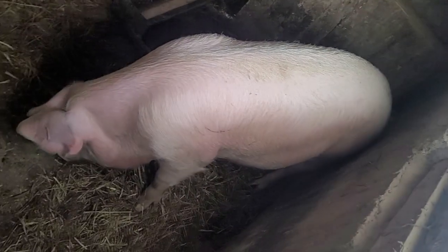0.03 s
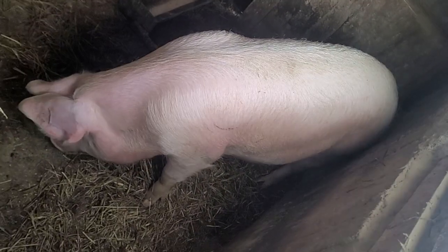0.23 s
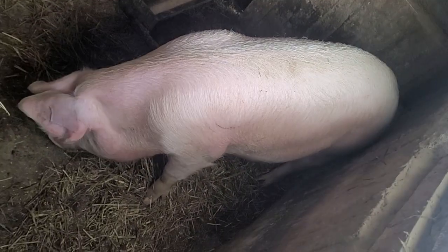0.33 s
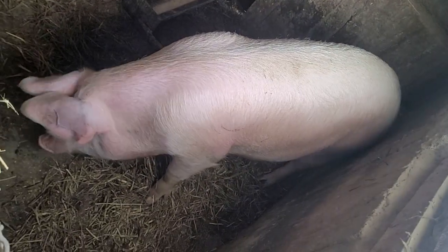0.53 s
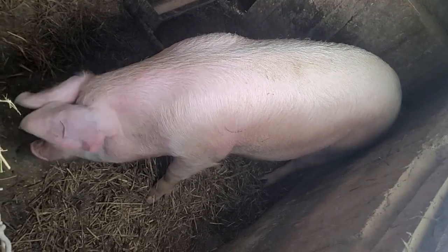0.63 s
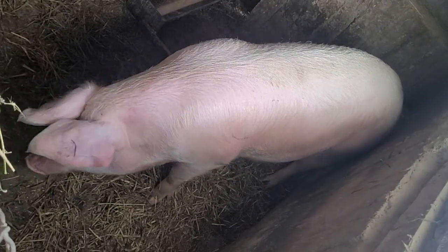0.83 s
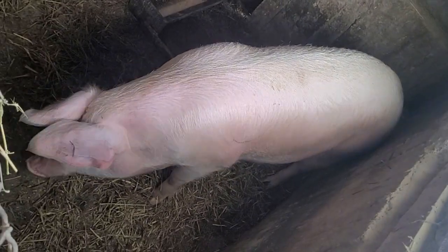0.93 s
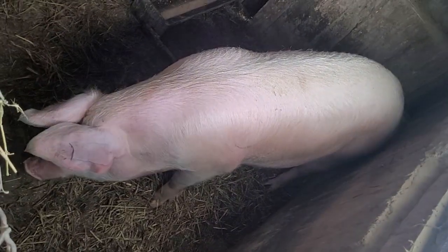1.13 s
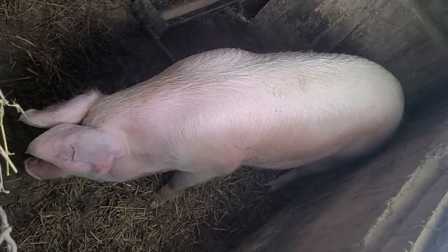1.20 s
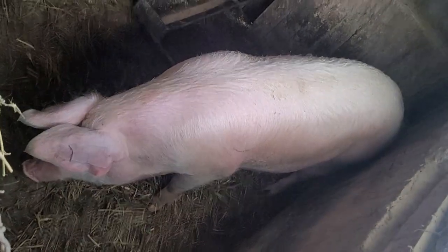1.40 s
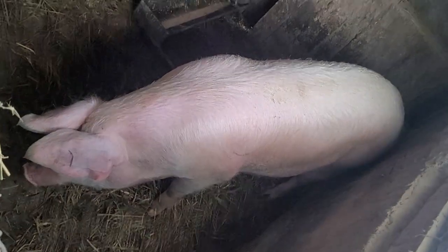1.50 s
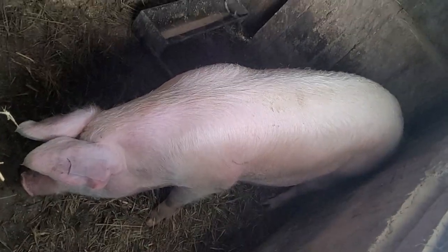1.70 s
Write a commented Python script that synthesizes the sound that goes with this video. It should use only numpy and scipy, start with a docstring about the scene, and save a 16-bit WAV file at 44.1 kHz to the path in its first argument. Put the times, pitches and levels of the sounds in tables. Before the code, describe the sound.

One dull thump in a pig pen, with soft bumps and faint straw rustling.

```python
"""Pig shifting in a concrete pen

One dull thump booms between the walls and leaves a thin low ring, perhaps a rail. Around it the
pig's body bumps softly and straw rustles; a small hollow tap and a close crunch follow. The microphone,
muffled on its right side, rumbles with handling at the start and takes a dull nudge at the end."""
import sys
import numpy as np
from scipy import signal
from scipy.fft import rfft, irfft, next_fast_len
from scipy.io import wavfile
from scipy.ndimage import map_coordinates

SR = 44100
rng = np.random.default_rng(int(sys.argv[2]) if len(sys.argv) > 2 else 0)


def inscribe(sig):
    """Save sig as 16-bit PCM at rate SR to the path in sys.argv[1].

    A 1-D sig is mono; a 2-D sig holds one channel per row.
    Samples are clipped to [-1, 1] before scaling.
    """
    pcm = np.round(np.clip(np.atleast_2d(sig).T, -1, 1) * 32767)
    wavfile.write(sys.argv[1], SR, pcm.astype(np.int16))


N = 77175


def amp(db):
    """Decibels to gain."""
    return 10 ** (np.asarray(db) / 20)


def unit(x):
    """Scale to rms 1."""
    return x / np.sqrt(np.mean(x ** 2) + 1e-20)


def along(points, hz):
    """Read a curve of (Hz, value) points on a log frequency axis."""
    freqs, values = np.transpose(points)
    return np.interp(np.log(hz + 1), np.log(freqs + 1), values)


def since(start):
    """Seconds since start, zero before."""
    return np.maximum(np.arange(N) / SR - start, 0)


def envelope(start, rise, t60, hold=0):
    """Linear rise, hold, then a fall of 60 dB per t60; all times in seconds."""
    t = since(start)
    attack = np.minimum(t / max(rise, 1e-4), 1)
    return attack * amp(-60 * np.maximum(t - rise - hold, 0) / t60)


def filtered(x, response):
    """Filter x by a complex gain given as a function of Hz."""
    size = next_fast_len(N + SR // 2)
    return irfft(rfft(x, size) * response(np.fft.rfftfreq(size, 1 / SR)), size)[..., :N]


# How alike the pen sounds at the microphone's two sides. Each row: frequency in Hz, correlation.
STEREO_LIKENESS = [(60, 1), (250, 0.49), (500, 0.38), (1000, 0.9), (3000, .1)]

def noise(colour_db):
    """Stereo noise of rms 1, alike in the deep bass and diffuse in the treble."""
    def mid_side_gains(hz):
        angle = np.arccos(np.clip(along(STEREO_LIKENESS, hz), -1, 1)) / 2
        return amp(colour_db(hz)) * [np.cos(angle), np.sin(angle)]
    mid, side = filtered(rng.standard_normal((2, N)), mid_side_gains)
    return unit(np.array([mid + side, mid - side]))


def wash(spectrum):
    """Stereo noise shaped by (Hz, relative dB) points."""
    return noise(lambda hz: along(spectrum, hz))


# The quiet of the pen, all around the microphone. Each row: frequency in Hz, relative level in dB.
AIR_SPECTRUM = [(20, -20.5), (50, -10), (130, -5), (280, 3.5), (500, -3.5), (800, -12), (1400, -6),
                (1800, -14.5), (3200, -14), (3900, -7), (5000, -15), (7300, -15), (8600, -23), (12000, -21),
                (15500, -25.5)]

def still_air():
    """A faint, steady wash under everything."""
    return amp(-60.5) * wash(AIR_SPECTRUM)


# Handling noise, right on the microphone. Each row: frequency in Hz, relative level in dB.
RUMBLE_SPECTRUM = [(18, -22), (32, -1), (55, -4), (100, -5.5), (250, -42.5)]

def handling_rumble():
    """Handling the microphone makes a brief, deep rumble at the start."""
    return amp(-45.5) * envelope(0, rise=0.036, t60=0.55, hold=0.05) * wash(RUMBLE_SPECTRUM)


# The colour of a soft bump. Each row: frequency in Hz, relative level in dB.
BUMP_SPECTRUM = [(20, -39), (35, -20.5), (60, -13.5), (100, -20.5), (140, -10.5), (250, -1), (420, -8.5),
                 (550, -13.5), (750, -20), (1100, -12.5), (3000, -37)]
# Soft bumps of the pig's body in the pen. Each row: start in seconds, level in dB, rise and t60 in
# seconds, upper edge in Hz.
BODY_BUMPS = [(0, -41, 0.0013, 1, 410), (0.074, -40, 0.013, 0.84, 605), (0.135, -39.5, 0.0035, 0.32, 290),
              (0.186, -44, 0.015, .5, 1210), (0.338, -23, 0.0029, 0.22, 507), (0.484, -45, .01, 0.1, 1820),
              (.545, -42.5, 0.011, 0.073, 676), (.645, -51.5, 0.052, 1, 258), (.97, -50.5, 0.021, 0.6, 915),
              (1.029, -46.5, 0.017, 0.052, 430), (1.389, -48, 0.0033, 0.055, 146),
              (1.436, -49, 0.0096, .4, 700), (1.467, -48, 0.0017, .2, 606), (1.505, -45.5, 0.0024, .4, 430),
              (1.551, -49.5, 0.0071, 0.29, 900), (1.593, -43.5, 0.0031, .1, 348),
              (1.645, -50.5, 0.0035, .3, 1210)]

def body_bumps():
    """Low puffs, each with its own level and dullness."""
    out = np.zeros((2, N))
    for start, db, rise, t60, edge_hz in BODY_BUMPS:
        colour = lambda hz: along(BUMP_SPECTRUM, hz) - 10 * np.log10(1 + (hz / edge_hz) ** 4)
        out += amp(db) * envelope(start, rise, t60) * noise(colour)
    return out


def stalk_grain(rate_hz):
    """The slight, fast random flutter in level of many stalks slipping."""
    knots = rng.standard_normal(N // 8)
    flutter_db = -0.5 * map_coordinates(knots, [np.arange(N) * rate_hz / SR], mode="wrap")
    return unit(amp(flutter_db))


# The colour of the straw in the pen. Each row: frequency in Hz, relative level in dB.
STRAW_SPECTRUM = [(200, 10), (600, 4.5), (1400, 0.5), (1800, -0.5), (4000, -9), (7400, -5), (8600, -18),
                  (12000, -9.5), (15500, -23)]
# Straw stirring around the pig. Each row: start in seconds, level in dB, rise and t60 in seconds,
# centre in Hz, width in octaves.
STRAW_RUSTLES = [(0, -50, 0.0011, 1, 2080, 2.5), (.048, -50, .006, 0.87, 2470, 1.7),
                 (.091, -49, 0.0032, .15, 11000, 3), (0.129, -53, .01, 0.51, 6000, 2),
                 (0.229, -51.5, 0.007, 0.6, 9030, 4.7), (0.339, -59, .02, 0.99, 4500, 1.8),
                 (.431, -62, .002, 0.048, 14000, .4), (.46, -57.5, .02, 0.42, 6350, 1.7),
                 (.49, -59, 0.032, 0.63, 2370, 1.2), (0.677, -56, .012, 0.34, 743, 0.23),
                 (.68, -58, 0.017, 0.49, 4230, 0.35), (.721, -57.5, 0.0053, 0.21, 6000, 1.2),
                 (0.886, -55, .001, 0.42, 7300, 4), (0.918, -53.5, 0.022, 1, 1200, 2.5),
                 (0.991, -59, .005, 0.47, 6000, 1.3), (1.085, -62.5, 0.0027, 0.056, 13000, 0.32),
                 (1.15, -66, 0.01, 1, 11400, 0.9), (1.23, -62, 0.041, 0.45, 11900, 2.3),
                 (1.274, -57.5, .006, 0.14, 5040, 0.086), (1.291, -55.5, 0.0054, 0.31, 6500, 1.85),
                 (1.414, -57.5, 0.014, 0.85, 6000, 5.6), (1.508, -52, .04, 0.38, 4840, 7.5)]

def straw_rustles():
    """Stalks slip in short grainy bursts, each in its own register."""
    out = np.zeros((2, N))
    for start, db, rise, t60, centre_hz, octaves in STRAW_RUSTLES:
        off_centre = lambda hz: np.log2((hz + 1) / centre_hz) / octaves
        colour = lambda hz: along(STRAW_SPECTRUM, hz) - 20 * np.log10(1 + off_centre(hz) ** 2)
        out += amp(db) * envelope(start, rise, t60) * noise(colour) * stalk_grain(rate_hz=750)
    return out


# The blow where it lands, then its boom between the concrete walls.
# Each row: frequency in Hz, relative level in dB.
CONTACT_SPECTRUM = [(25, -51.5), (45, -45), (80, -9.5), (160, -28.5), (250, 4), (380, -13.5), (500, -6),
                    (720, -18), (950, -34.5), (1150, -44.5), (1520, -28.5), (1700, -45.5), (2150, -44.5),
                    (2750, -32), (3100, -51), (7000, -62), (15000, -71)]
BOOM_SPECTRUM = [(25, -52.5), (42, -33), (60, -23), (110, -8.5), (185, -6.5), (250, -6), (370, -0.5),
                 (520, -11.5), (760, -14), (1000, -35), (1480, -27.5), (1750, -44.5), (2300, -38.5),
                 (2750, -40.5), (3100, -69), (15000, -76.5)]

def thump(start):
    """A soft, heavy blow: a brief contact and its dense echoes."""
    contact = amp(-12) * envelope(start, rise=0.0053, t60=0.12) * wash(CONTACT_SPECTRUM)
    boom = amp(-25) * envelope(start, rise=0.02, t60=0.59, hold=0.074) * wash(BOOM_SPECTRUM)
    return contact + boom


# The struck pen's modes, heard from the microphone. Each row: frequency in Hz, left level in dB,
# build-up, hold and t60 in seconds, left over right in dB.
PEN_MODES = [(152.5, -28, .05, .055, .42, 1.5), (266, -14, .005, .03, .42, 3.5),
             (361.5, -11.5, .028, .038, .25, 6), (720, -36, .015, .12, .58, 0), (55, -37, .005, .08, .7, 1),
             (77, -35, .005, .09, .65, 1), (226, -24, .005, .08, .55, 2), (247, -29, .01, .14, .3, 2),
             (322, -26, .008, .1, .3, 3), (416, -35, .02, .1, .45, 3), (474, -26, .003, .02, .28, 4),
             (603, -47, .005, .02, 1.1, 3), (909, -54, .005, .03, .45, 5), (2645, -51, .003, .01, .25, 12),
             (2795, -50, .003, .01, .3, 12)]

def pen_ring(start):
    """The modes of the pen build up and die away after a blow."""
    out = np.zeros((2, N))
    for hz, left_db, build, hold, t60, balance_db in PEN_MODES:
        ring = np.sin(2 * np.pi * hz * since(start)) * envelope(start, build, t60, hold)
        right_db = left_db - balance_db - along(RIGHT_SIDE_GAIN, hz)  # offsets the muffling
        out += amp([[left_db], [right_db]]) * ring
    return out


def thin_ring(start, hz):
    """One low mode, perhaps of a rail, rings on long after the blow."""
    return amp(-44.5) * envelope(start, rise=0.016, t60=6.45) * np.sin(2 * np.pi * hz * since(start))


# The tap as it comes back off the walls. Each row: frequency in Hz, relative level in dB.
TAP_ECHO_SPECTRUM = [(300, -34), (700, -18), (1000, -21), (1200, -11.5), (1480, -13.5), (1700, -30.5),
                     (2000, -23.5), (3000, -36), (8000, -48.5)]

def hollow_tap(start, hz, sag_hz_per_s):
    """A hollow pop, left of centre, falls an octave and echoes between the walls."""
    pitch = np.maximum(hz - sag_hz_per_s * since(start), hz / 2)
    tone = np.sin(2 * np.pi * np.cumsum(pitch) / SR)
    pop = amp([[-32], [-38]]) * envelope(start, rise=0.0011, t60=0.043) * tone
    echo = amp(-44.5) * envelope(start, rise=0.009, t60=1) * wash(TAP_ECHO_SPECTRUM)
    return pop + echo


# Straw crunching close to the microphone: the snap, then its echo.
# Each row: frequency in Hz, relative level in dB.
SNAP_SPECTRUM = [(500, -29), (2500, 2.5), (5000, -2.5), (7500, 4.5), (9000, -12), (15000, -3)]
CRUNCH_ECHO_SPECTRUM = [(100, -1.5), (400, -3), (700, 1.5), (1350, 4), (1700, -8), (2500, -4),
                        (5000, -11.5), (7500, -14.5), (9000, -22.5), (15000, -15.5)]

def straw_crunch(start):
    """Stalks give way with a bright snap and a duller echo."""
    snap = amp(-38.5) * envelope(start, rise=0.001, t60=0.058) * wash(SNAP_SPECTRUM)
    echo = amp(-42.5) * envelope(start, rise=0.00067, t60=0.24, hold=0.022) * wash(CRUNCH_ECHO_SPECTRUM)
    return snap * stalk_grain(rate_hz=1200) + echo * stalk_grain(rate_hz=700)


def nudge(centre_s, width_s):
    """One dull push on the microphone's housing, fed to both sides alike."""
    offset = (np.arange(N) / SR - centre_s) / width_s
    return amp(-36) * (offset ** 2 - 1) * np.exp(-offset ** 2 / 2)


def scene():
    """The pig shifts in its straw, thumps once and settles; a tap, a crunch and a nudge follow."""
    thump_s, settle_s = 0.2435, 0.465
    out = still_air() + handling_rumble() + body_bumps() + straw_rustles()
    out += thump(thump_s) + pen_ring(thump_s) + thin_ring(thump_s, hz=222.2)
    out += amp(-31) * pen_ring(settle_s)
    out += hollow_tap(start=1.402, hz=1456, sag_hz_per_s=22000)
    out += straw_crunch(start=1.689)
    return out + nudge(centre_s=1.7125, width_s=0.0011)


# The microphone's muffled right side. Each row: frequency in Hz, gain in dB.
RIGHT_SIDE_GAIN = [(60, 3.5), (200, -4), (700, -3.5), (1300, -10.5), (2400, -18.5), (4400, -27),
                   (8000, -35), (15000, -26.5)]

def record(dry):
    """The microphone's right side hears late and muffled; both lose the deepest bass and the top."""
    low_cut_hz, top_hz, right_lag_s = 38, 15800, 0.00032
    def response(hz):
        right = amp(along(RIGHT_SIDE_GAIN, hz)) * np.exp(-2j * np.pi * hz * right_lag_s)
        return np.array([np.ones_like(hz), right]) * (hz < top_hz)
    low_cut = signal.butter(2, low_cut_hz, "high", fs=SR, output="sos")
    return filtered(signal.sosfilt(low_cut, dry), response)


dry = scene()
out = record(dry)
inscribe(out)
```